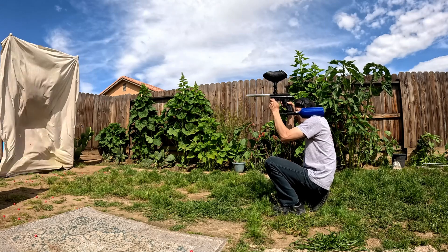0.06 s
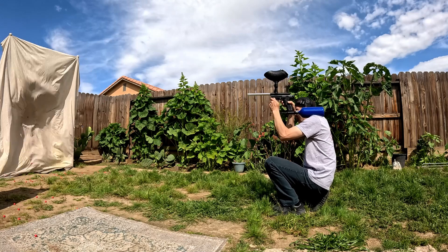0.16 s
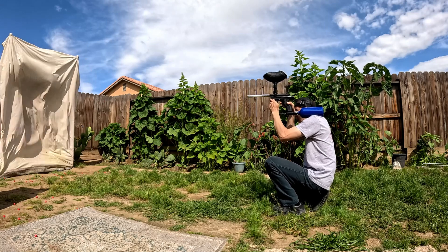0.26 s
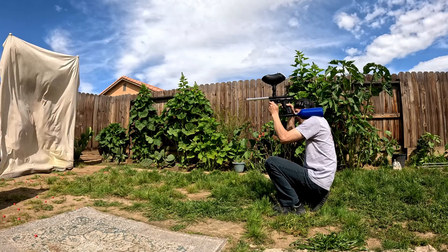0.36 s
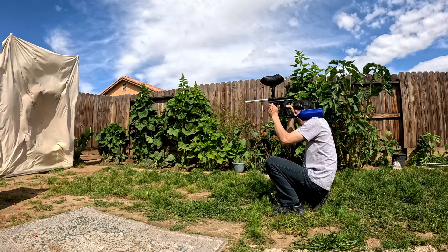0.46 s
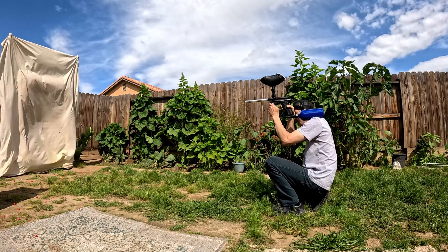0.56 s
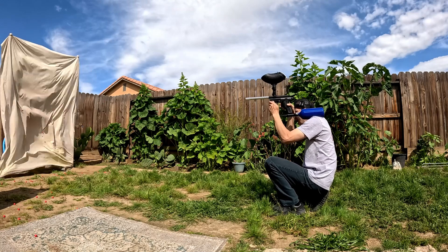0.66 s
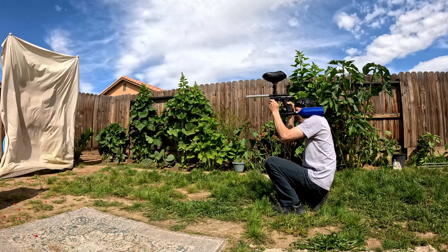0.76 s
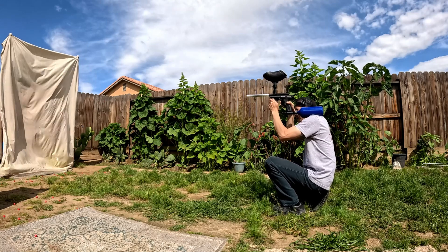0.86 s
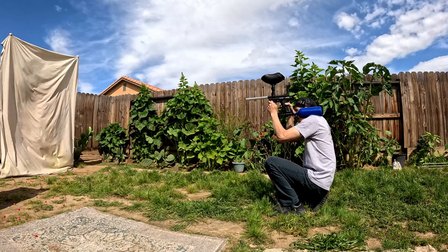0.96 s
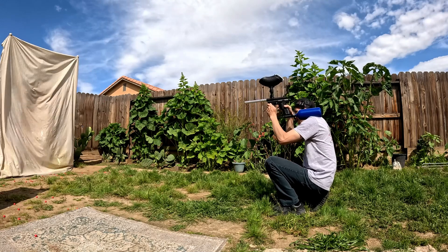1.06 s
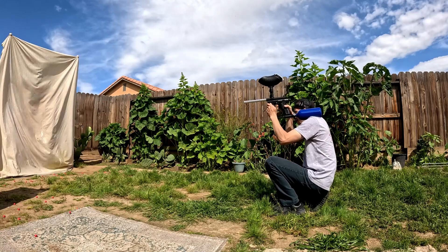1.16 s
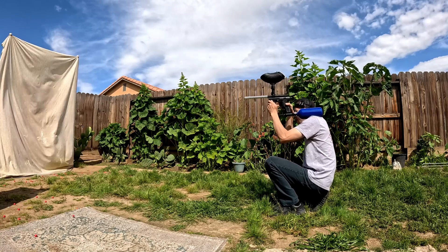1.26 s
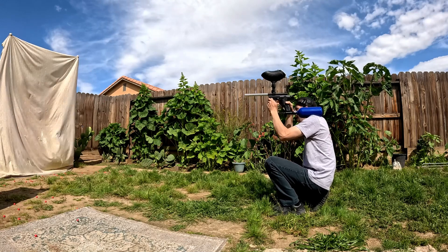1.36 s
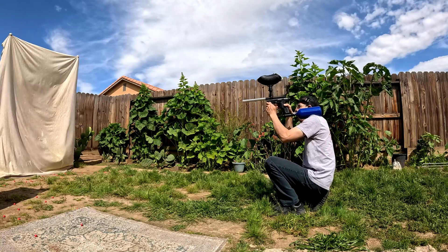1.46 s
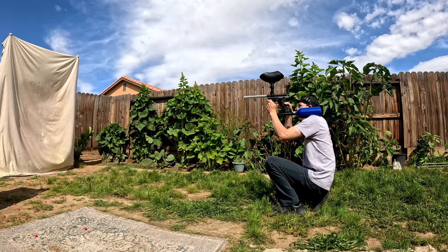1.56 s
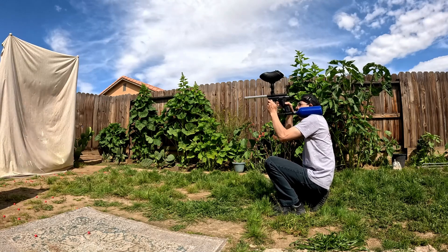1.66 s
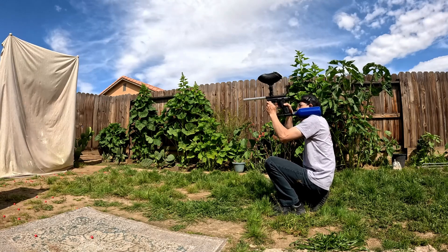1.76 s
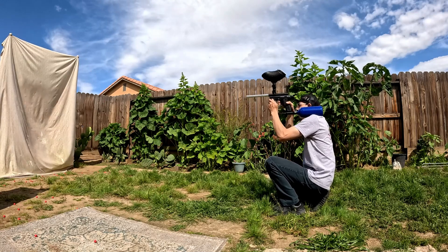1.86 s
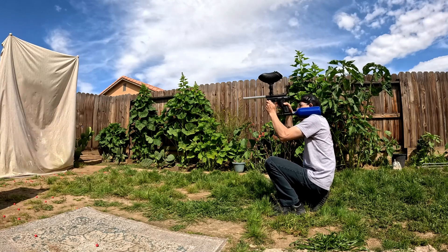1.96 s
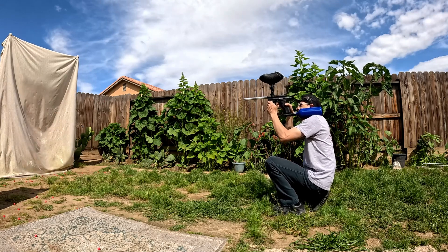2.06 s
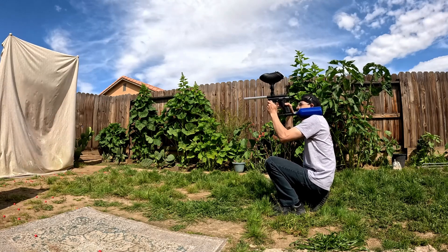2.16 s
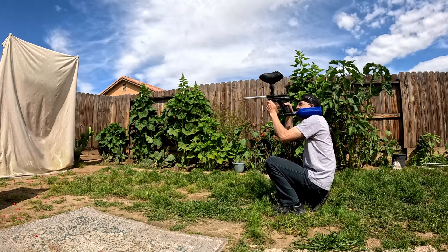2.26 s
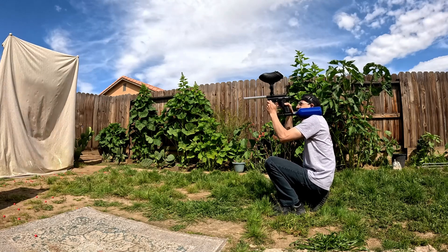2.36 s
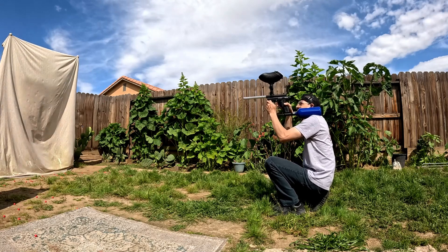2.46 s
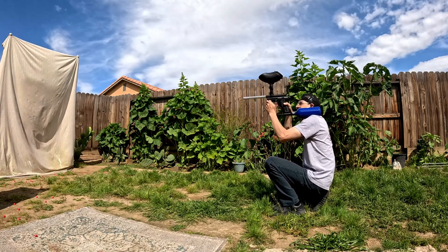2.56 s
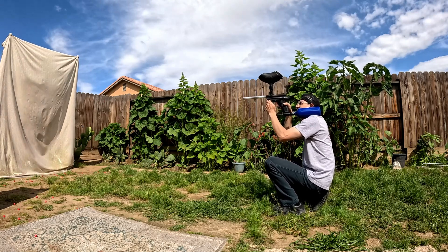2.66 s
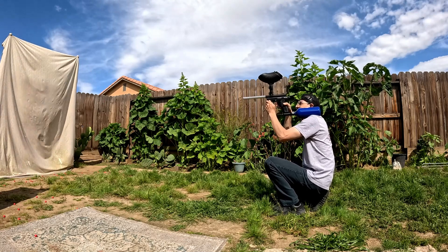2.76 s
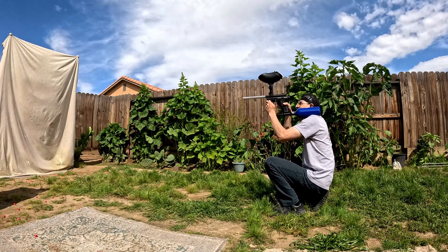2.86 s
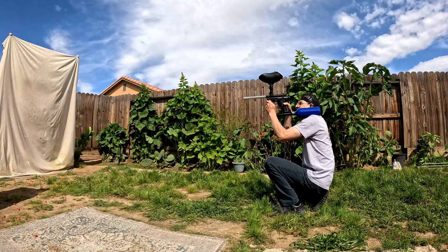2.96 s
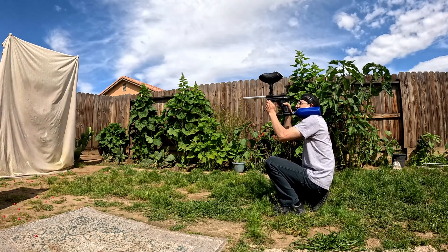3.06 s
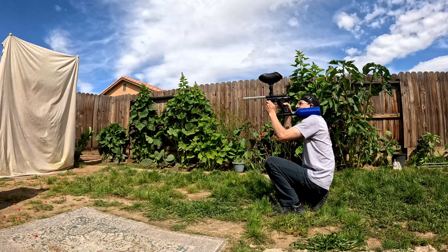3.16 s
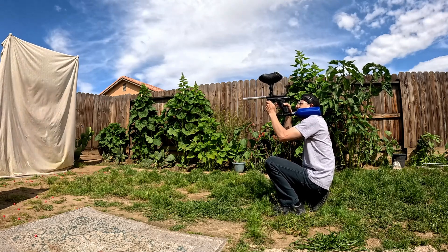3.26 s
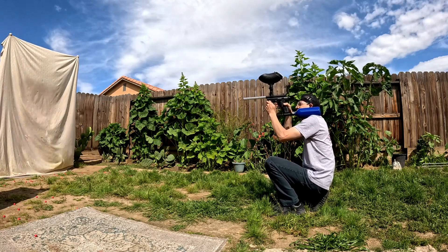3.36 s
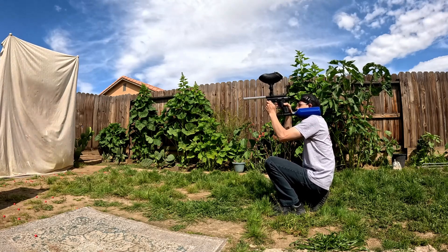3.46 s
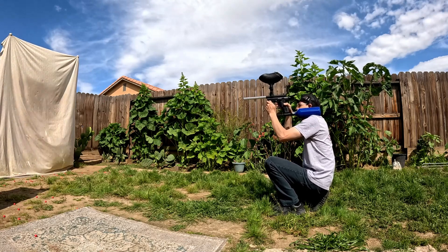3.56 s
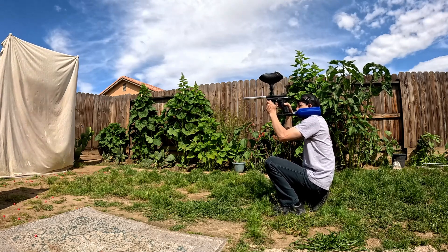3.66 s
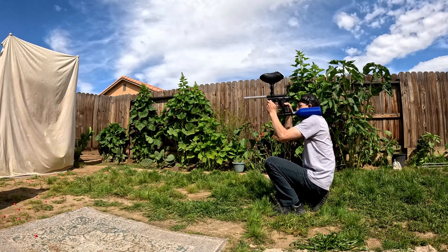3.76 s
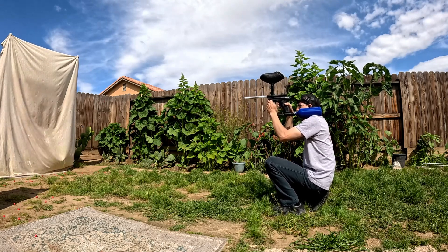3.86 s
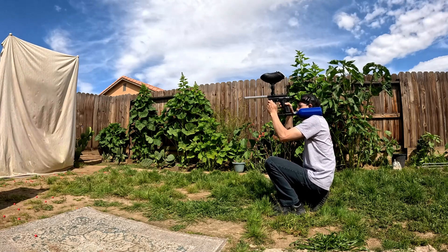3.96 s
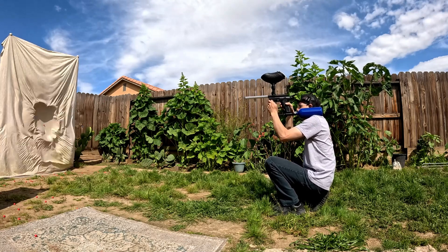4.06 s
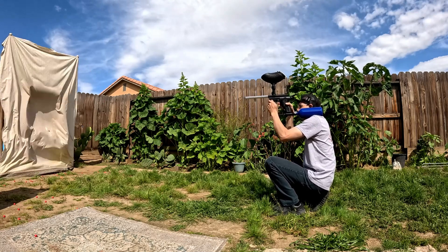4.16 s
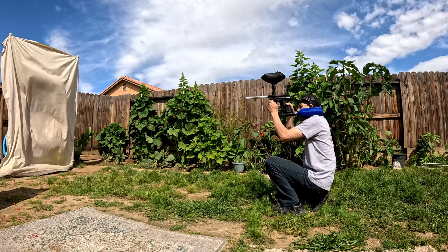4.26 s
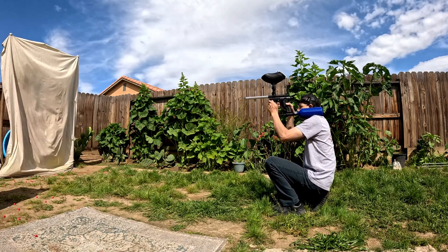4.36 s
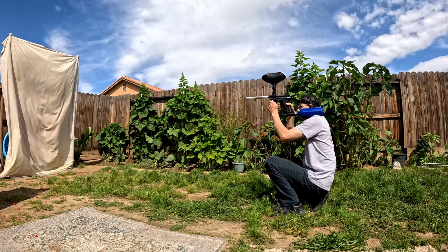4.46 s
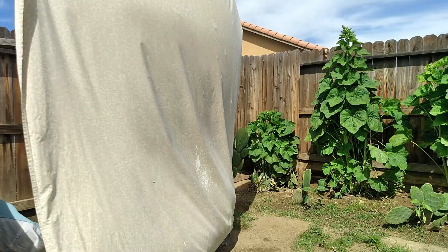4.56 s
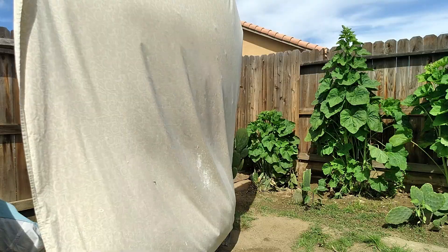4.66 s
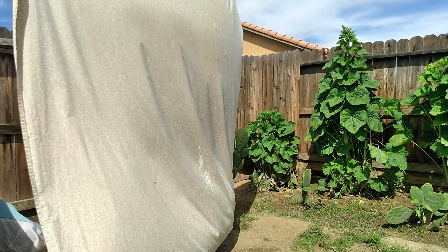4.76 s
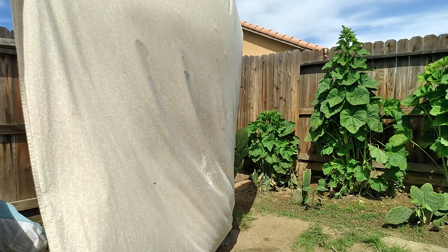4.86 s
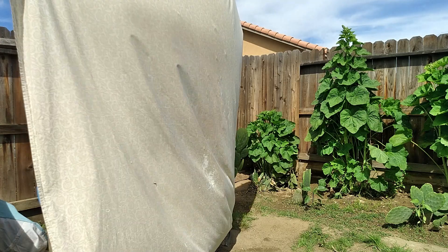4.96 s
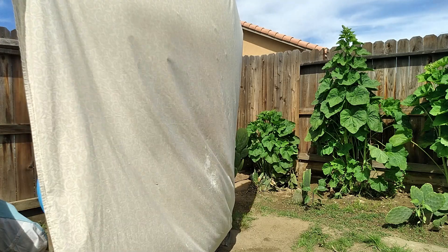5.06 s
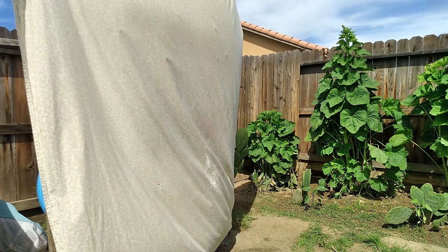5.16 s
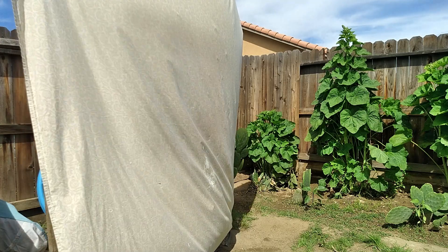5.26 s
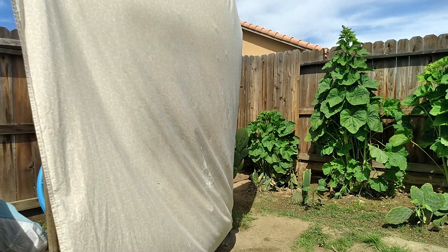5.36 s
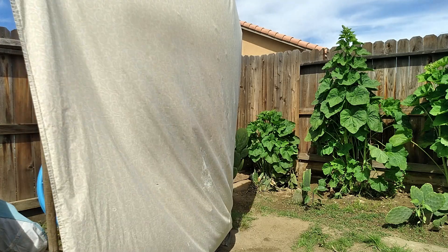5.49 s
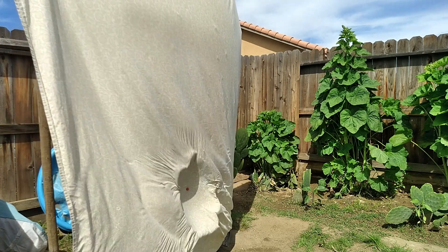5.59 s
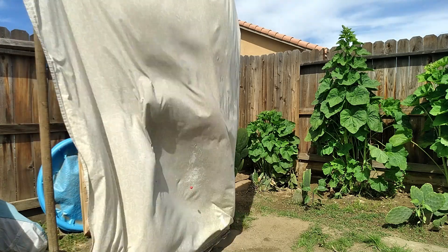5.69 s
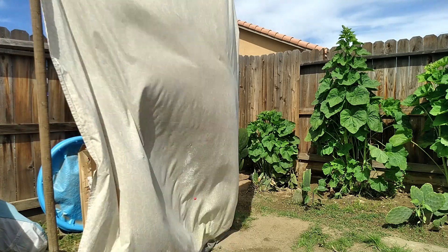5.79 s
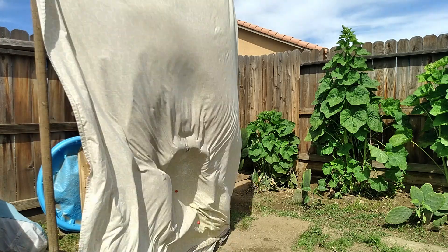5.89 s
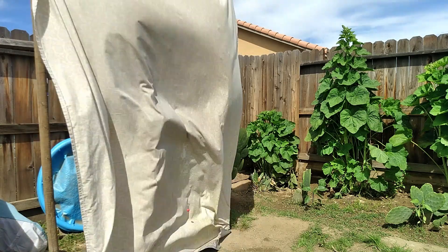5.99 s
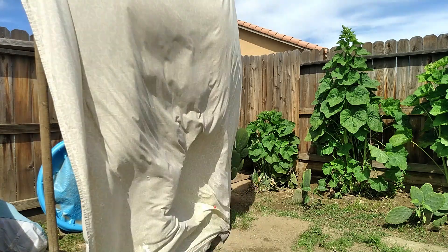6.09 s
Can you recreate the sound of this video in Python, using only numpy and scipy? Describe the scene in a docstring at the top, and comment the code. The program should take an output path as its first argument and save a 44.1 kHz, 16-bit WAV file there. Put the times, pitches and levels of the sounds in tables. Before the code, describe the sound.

Heard from close beside the shooter, sharp air blasts run about five a second, each ball thudding into cloth slightly later, with short echoes off fence and houses. The final two are brighter, empty cracks. Rolling balls rattle and scrape in a hopper through the breezy lull, then a single shot slaps home. From beside the target, quiet hiss and a faint wavering hum give way to three distorted blasts with big flapping cloth.

```python
"""A fenced backyard: a gas-powered paintball marker fires at a hanging sheet, and two shots go off empty.
Bolt, gas and cloth are shaped noise bursts, damped modes and air pulses; delayed copies and decaying noise are echoes.
Balls knock and roll in the hopper as noise grains and irregular bumps, and one more shot follows.
Then the listener stands beside the sheet, down range, where shots hiss and overload the microphone.
Breeze and a faint steady background with microphone hiss are filtered noise; a soft hollow tone, a wavering
sine in noise, swells in the lull."""
import sys
import numpy as np
from scipy import signal
from scipy.fft import rfft, irfft, next_fast_len
from scipy.io import wavfile

SR = 44100
rng = np.random.default_rng(int(sys.argv[2]) if len(sys.argv) > 2 else 0)


def log_audio(samples):
    """Write samples as a 16-bit WAV file to the path given in sys.argv[1]."""
    # one column per channel
    frames = np.atleast_2d(samples).T
    # limit to full scale, then quantise
    limited = np.clip(frames, -1, 1)
    pcm = np.round(limited * 32767).astype(np.int16)
    wavfile.write(sys.argv[1], SR, pcm)


N = 270333
LEAD = SR // 10   # samples of run-in before time zero
MOVE_S = 4.545   # the listening place changes from beside the shooter to beside the sheet
AGE = np.arange(int(.3 * SR)) / SR   # seconds since a short sound began
TIME = np.arange(N) / SR


# Shots: blast t/s, relative blast level/dB, relative bolt level/dB, ball in the barrel (0 or 1)
SHOTS = [(-.0045, -2.5, 3.5, 1), (.193, -2.5, -2.5, 1), (0.4098, -2, -1.5, 1), (0.6217, -3, -3, 1),
         (0.8469, 2, -1.5, 0), (1.068, 3, -4, 0), (4.0798, -0.5, 2.5, 1), (5.648, 1.5, -3, 1),
         (5.8956, 1.5, -1, 1), (6.1012, 1, -0.5, 1)]
# Balls striking the sheet: t/s, relative thump level/dB, relative flapping level/dB, relative snap level/dB
HITS = [(.071, 0.5, -3.5, -1), (0.2708, -6, -1, -3), (0.4846, 1.5, 1, 0), (0.6975, -2.5, -2.5, -2),
        (4.1508, 2.5, 0.5, 0), (5.7013, 7, 1, 8.5), (5.9509, 2, 5, 7.5)]
# Spent balls ticking behind the sheet: t/s, relative level/dB
TICKS = [(4.237, -35), (5.762, -7.5), (6.051, -9.5)]
# Echo envelope of the yard, grass and fence first, then the houses around: t/s, level/dB
YARD = [(0, -48.5), (.006, -37.5), (.02, -42), (.05, -47.5), (.09, -53.5), (.15, -51.5), (.19, -58.5),
        (.25, -66), (.42, -80.5), (.7, -105)]
# Echo envelope beside the sheet: t/s, level/dB
SHEET_CORNER = [(0, -34.5), (.006, -39.5), (.02, -40.5), (.05, -44.5), (.1, -48), (.2, -63), (.7, -110)]
# Likeness of the yard's echoes in the two ears: f/Hz, correlation (0-1)
ECHO_ALIKE = [(100, 0.97), (300, 0.98), (700, 0.2), (2000, .55), (12000, 1)]
# Likeness of the two ears for echoes and sounds by the sheet: f/Hz, correlation (0-1)
NEAR_ALIKE = [(100, 0.99), (280, 0.96), (700, 0.069), (2000, 0.039), (12000, 0.083)]


def firing(bolt_travel_s):
    """Superposition: shots and hits add linearly, each with the echoes of the listener's place."""
    beside, down_range = np.zeros((2, 2, LEAD + N))
    for s, blast_db, bolt_db, loaded in SHOTS:
        near = s > MOVE_S
        track = down_range if near else beside
        if near:
            bolt, gas = shot_from_front(blast_db, bolt_db)
        else:
            bolt, gas = shot_from_side(blast_db, bolt_db, loaded)
        add(track, s - bolt_travel_s, bolt)
        add(track, s, gas)
    for s, thump_db, flap_db, snap_db in HITS:
        near = s > MOVE_S
        add(down_range if near else beside, s, slap(thump_db, flap_db, snap_db, near))
    for s, db in TICKS:
        tick = burst(fade(t60=0.047), NEAR_BOLT, NEAR_ALIKE)
        add(down_range if s > MOVE_S else beside, s, from_db(db) * tick)
    before_move = np.clip((MOVE_S - TIME) / 0.0076, 0, 1)
    heard_beside = outdoors(beside, YARD, ECHO_ALIKE) * before_move
    return heard_beside + outdoors(down_range, SHEET_CORNER, NEAR_ALIKE)


# Spectrum of the bolt clack from the side: f/Hz, level/dB
BOLT = [(100, -17.5), (600, -28.5), (1200, -19), (2000, -19), (3200, -10), (5000, -15), (8000, -24.5),
        (11000, -26), (15000, -40.5)]
# Damped modes of the steel bolt: f/Hz, relative level/dB, t60/s
STEEL = [(3150, -44.5, .08), (3600, -42, .09), (6352, -45, .13), (8100, -44, 0.12), (9740, -42, .14),
         (10780, -36, 0.29), (10900, -41.5, .16)]
# Spectrum of the blast behind a ball: f/Hz, level/dB
BLAST = [(100, -10.5), (280, -3.5), (500, 6), (900, -0.5), (1500, 0.5), (3500, -0.5), (6200, -2),
         (8000, -19), (11000, -23), (15000, -45)]
# Spectrum of the blast from an empty barrel: f/Hz, level/dB
EMPTY_BLAST = [(100, -13.5), (330, -4.5), (600, 4), (1300, 2.5), (3000, 0), (6000, -3.5), (8000, -14.5),
               (11000, -12), (15000, -23)]
# Likeness of the two ears for direct sound: f/Hz, correlation (0-1)
DIRECT_ALIKE = [(300, 1), (5000, 0.93), (11000, 0.41)]


def shot_from_side(blast_db, bolt_db, loaded):
    """Impact and gas discharge: a ball holds the gas back, an empty barrel lets it out in one crack."""
    two_knocks = fade(t60=0.03) + 0.99 * fade(t60=0.04, delay=0.0036)
    bolt = burst(two_knocks, BOLT, DIRECT_ALIKE) + from_db(-13.0) * ring(STEEL)
    if loaded > .5:
        two_surges = .8 * fade(t60=0.013) + .95 * fade(t60=.016, delay=.003)
        gas = burst(two_surges, BLAST, DIRECT_ALIKE) + 0.27 * puff(hz=135, swell_s=0.0031)
    else:
        gas = gas_burst(0.95 * fade(t60=0.016), EMPTY_BLAST) + 0.34 * puff(hz=164.4, swell_s=0.0017)
    bolt_heard = to_right(from_db(bolt_db) * bolt, pan_db=2.0, lag=0.97)
    gas_heard = to_right(from_db(blast_db) * gas, pan_db=0.5, lag=1.0)
    return bolt_heard, off_fence(gas_heard)


def gas_burst(envelope, spectrum):
    """Impulsive discharge: phases alone are kept, so the crack holds all pitches evenly before colouring."""
    x = envelope * noise(DIRECT_ALIKE, len(AGE))
    held = (envelope / envelope.max()) ** (1 / 4)
    for _ in range(3):
        flat = irfft(np.exp(1j * np.angle(rfft(x))), len(AGE))
        x = held * flat
    return colour(rms_one(x) * np.sqrt(np.mean(envelope ** 2)), spectrum)


# Flat echoes off the fence boards: delay t/s, level/dB
FENCE = [(0.0176, -11.5), (0.021, -11), (0.032, -15.5)]


def off_fence(x):
    """Specular reflection: plants stand before the fence, so only the boom comes back whole."""
    dull = colour(x, [(250, 1), (700, -14.5), (3000, -15.5)])
    i = np.arange(x.shape[1])
    for s, db in FENCE:
        echo = np.array([np.interp(i - s * SR, i, side, left=0) for side in dull])
        x = x + from_db(db) * echo
    return x


# Spectrum of the bolt down range and of the ticks: f/Hz, level/dB
NEAR_BOLT = [(100, -42), (350, -16), (900, -36), (2000, -13.5), (4500, -10), (6500, -19.5), (10500, -4.5),
             (12500, -17), (15500, -24)]
# Spectrum of the gas jet down range: f/Hz, level/dB
JET = [(80, -2.5), (220, -4), (400, 2.5), (800, 5.5), (1300, -3.5), (2500, -2), (4500, -4), (7000, -7),
       (9000, -4), (10700, 2), (12500, -6), (15500, -9)]
# Likeness of the jet and bolt in the two ears: f/Hz, correlation (0-1)
JET_ALIKE = [(100, 0.53), (280, 1), (700, 0.28), (2000, 0.2), (12000, 0.48)]


def shot_from_front(blast_db, bolt_db):
    """Jet directivity: down range the barrel points at the listener, a long, bright jet of gas."""
    two_knocks = fade(t60=0.06) + 0.34 * fade(t60=.03, delay=0.012)
    bolt = burst(two_knocks, NEAR_BOLT, JET_ALIKE) * from_db([[2.5], [-2.5]])
    bolt = bolt + from_db(13) * ring(STEEL)
    jet = burst(fade(t60=0.16), JET, JET_ALIKE) + from_db(11) * ring(STEEL)
    bolt_heard = to_left(from_db(bolt_db) * bolt, lag_s=0.000454)
    return bolt_heard, to_left(from_db(blast_db) * jet, lag_s=0.00048)


# Spectrum of the cloth's snap: f/Hz, level/dB
SNAP = [(200, -3.5), (700, 0), (1300, 5), (2200, -9), (5000, -13.5), (10000, -26.5), (15000, -43)]
# Slack-drum modes of the sheet: f/Hz, relative level/dB, t60/s
SHEET = [(70, -29, 0.11), (129, -19.5, 0.043), (204, -26.5, 0.071), (278, -23.5, 0.17)]
# Spectrum of the flapping from afar: f/Hz, level/dB
FLAP = [(40, -9), (80, -2), (130, -1), (200, 5), (380, 3.5), (600, -6.5), (1000, -14), (2000, -30),
        (5000, -36.5), (12000, -63)]
# Spectrum of the flapping close by: f/Hz, level/dB
NEAR_FLAP = [(40, -21), (80, 7), (150, -5), (350, 12), (550, 0.5), (800, 5.5), (1400, -11), (3000, -12.5),
             (12000, -33)]
# Spectrum of the flipping hem: f/Hz, level/dB
HEM = [(80, -29), (250, -22), (420, -13.5), (600, -20.5), (1000, -29.5), (3000, -48.5), (12000, -66.5)]


def slap(thump_db, flap_db, snap_db, near):
    """Membrane excitation: cloth snaps taut, is pushed away, rings, and ripples out to its hem."""
    alike = NEAR_ALIKE if near else DIRECT_ALIKE
    snap = burst(fade(t60=0.0095), SNAP, alike) * from_db([[2.2], [-2.2]])
    thump = -.42 * puff(hz=164, swell_s=0.0016, delay=0.00067) - ring(SHEET)
    if near:
        # close by, the slow heave of the whole sheet is heard too, and the snap lasts longer
        thump = thump - 0.12 * puff(hz=88.3, swell_s=0.013)
        snap = snap + 0.39 * burst(fade(t60=0.041), SNAP, alike)
        flap = burst(1.22 * fade(t60=0.092, delay=0.00027), NEAR_FLAP, alike)
    else:
        flap = burst(1.1 * fade(t60=0.12, delay=0.0025), FLAP, alike)
    # the ripple reaches the hem a tenth of a second later and flips it
    hem = burst(np.exp(-((AGE - .106) / 0.015) ** 2), HEM, alike)
    return from_db(snap_db) * snap + from_db(thump_db) * thump + from_db(flap_db) * (flap + hem)


# Single knocks of balls, hopper and trigger, and a last faint, dull tick:
# t/s, relative peak level/dB, relative treble tilt/dB
CLICKS = [(1.5315, -30, -11.5), (1.5613, -37.5, -17.5), (1.8405, -38.5, 9), (1.9557, -48.5, 23.5),
          (2.0047, -46, -20), (2.1028, -37.5, 3), (2.318, -37, -27.5), (2.3376, -33.5, -20),
          (2.356, -38, -4), (2.8511, -20, -5.5), (2.863, -20, -7), (2.8705, -23, -9), (2.8773, -20.5, -9),
          (2.9095, -25, -7), (2.9632, -27.5, -12), (2.9875, -22.5, -5), (3.0148, -24, -12),
          (3.0263, -26, -10), (3.1003, -27, -9), (3.131, -28, -7), (3.1711, -22.5, 13), (3.1843, -22.5, 13),
          (3.1927, -17, 19), (3.5103, -16.5, 20), (3.5242, -24, 12), (3.551, -28.5, 27), (4.028, -32.5, 13),
          (4.664, -58, -32)]
# Spectrum of the plastic hopper knocked by a ball: f/Hz, level/dB
HOPPER = [(150, -18.5), (500, -5), (800, -16), (1100, 6), (1400, -5.5), (1900, 4), (3000, 3), (4200, -3),
          (6000, -5.5), (8000, -21), (13000, -38)]
# Relative spectrum of rolling, hopper body: f/Hz, level/dB
ROLL_BODY = [(500, -25), (850, -23.5), (1080, 5), (1400, -3.5), (1800, 8), (2500, -9), (3400, -11),
             (4500, -21.5), (8000, -40)]
# Relative spectrum of rolling, treble: f/Hz, level/dB
ROLL_TREBLE = [(1500, -26), (3000, 1), (4300, -1), (4950, 1.5), (5500, -6), (6500, -11.5), (8000, -27),
               (12000, -29), (15000, -43)]
# Relative spectrum of rolling, hollow low part: f/Hz, level/dB
ROLL_LOW = [(200, -22), (400, -4.5), (600, -2), (850, -16.5), (1500, -17), (5000, -55)]
# Damped modes of the trigger spring: f/Hz, relative level/dB, t60/s
SPRING = [(3063, -56.5, .15), (4344, -56, 0.19)]
TRIGGER_S = 4.028   # the trigger takes up and the spring rings faintly
RATTLE_DB = -4.5   # level of the bumps in the body part


def hopper(click_db, body_db, treble_db, low_db):
    """Contact excitation: balls knock, roll and rattle in a plastic shell, then the trigger takes up."""
    track = np.zeros((2, LEAD + N))
    for s, db, bright_db in CLICKS:
        knock = burst(fade(t60=0.0028) + 0.28 * fade(t60=.025), HOPPER, DIRECT_ALIKE)
        click = colour(knock, [(2000, 0.0024), (6000, 0.84 * bright_db)])
        add(track, s, from_db(db + click_db) * click / np.abs(click).max())
    body, treble, low = rolling_levels()
    bumps = from_db(RATTLE_DB) * rattle(ROLL_BODY, jitter=.35, spread_db=4.0)
    rolling = from_db(body_db) * grains(per_s=2700, spread_db=3.5, spectrum=ROLL_BODY)
    add(track, 0, body * (rolling + bumps))
    scrape = grains(per_s=2500, spread_db=2.5, spectrum=ROLL_TREBLE)
    scrape = scrape + from_db(-2) * rattle(ROLL_TREBLE, jitter=.3, spread_db=2.5)
    add(track, 0, from_db(treble_db) * treble * scrape)
    add(track, 0, from_db(low_db) * low * grains(per_s=170, spread_db=2.0, spectrum=ROLL_LOW))
    add(track, TRIGGER_S, ring(SPRING))
    return outdoors(to_right(track, pan_db=2.0, lag=0.6), YARD, ECHO_ALIKE, wet_db=-4)


# Each tilt of the hopper sets the balls rolling until they come to rest: t/s at full height,
# 60 dB swell/s, 60 dB fade/s, rolling on/s, then relative body, treble and hollow low level/dB
ROLLS = [(1.572, .13, 0.21, 0.12, -51.5, -63, -83), (1.778, .03, 0.34, 0.077, -61, -73, -90),
         (1.865, .13, .25, 0.079, -47, -61.5, -73), (2.01, 0.052, 0.62, 0.11, -55.5, -71, -69),
         (2.113, 0.068, 0.3, .07, -48, -59, -73), (2.35, 0.28, 0.31, .13, -47, -64.5, -72),
         (2.49, 0.27, 0.77, 0.37, -65, -92, -59.5), (2.587, 0.14, .3, 0.016, -58.5, -73.5, -74),
         (2.8, 0.23, .3, .005, -54.5, -88.5, -62.5), (2.885, .09, 0.43, 0.25, -42.5, -44.5, -47.5),
         (3.01, 0.38, 1.0, 0.16, -47, -52, -69), (3.194, .04, 0.15, .1, -43.5, -30.5, -66),
         (3.26, 0.21, 1, 0.25, -53.5, -44, -71), (3.514, .03, 0.49, .1, -46, -42.5, -61),
         (3.845, .04, .3, .03, -68.5, -70, -85)]
REST_S = 0.098   # coming to rest takes a further 60 dB off in this time


def rolling_levels():
    """Energy decay: each spell of rolling swells, slackens and stops, in body, treble and hollow gains."""
    total = 0
    for s, swell_s, fade_s, length_s, *levels_db in ROLLS:
        stop = from_db(-60 * np.clip((TIME - s - length_s) / REST_S, 0, 2))
        total = total + from_db(levels_db)[:, None] * swell(s, swell_s, fade_s) * stop
    return total


RATTLES_PER_S = 88   # median pace of rolling balls bumping


def rattle(spectrum, jitter, spread_db):
    """Irregular impact train: ball after ball bumps the shell at an uneven pace; rms 1."""
    pace, size = rng.standard_normal((2000, 2)).T
    at = (np.cumsum(np.exp(jitter * pace)) / RATTLES_PER_S * SR).astype(int)
    inside = at < N
    bumps = np.zeros(N)
    bumps[at[inside]] = from_db(spread_db * np.clip(size, -1.5, 1.5))[inside]
    envelope = signal.fftconvolve(bumps, fade(t60=0.011))[:N]
    return rms_one(colour(envelope * noise(DIRECT_ALIKE, N), spectrum))


def grains(per_s, spread_db, spectrum):
    """Shot noise: many tiny contacts of uneven size at random instants; rms 1."""
    sizes = from_db(spread_db * np.minimum(rng.exponential(1, N), 3))
    contacts = (rng.random(N) < per_s / SR) * sizes
    return rms_one(colour(contacts * noise(DIRECT_ALIKE, N), spectrum))


# Gusts: t/s, half length to 1/e/s, level/dB
GUSTS = [(2.125, 0.032, -50.5), (2.22, 0.21, -56), (3.06, 0.12, -56), (3.883, 0.23, -52), (4.2, .3, -48)]
# Relative spectrum of the wind: f/Hz, level/dB
WIND = [(15, -12), (30, 1.5), (55, 0), (100, -5.5), (200, -13), (400, -30.5), (800, -36.5), (2000, -45),
        (8000, -64.5)]
# Spectrum of the faint steady background noise with microphone hiss: f/Hz, level/dB
BACKGROUND = [(40, -60), (90, -56.5), (250, -56.5), (600, -67.5), (1000, -85.5), (3000, -86.5), (7000, -84),
              (9500, -78), (10700, -90), (12000, -85), (15000, -99)]
# Spectrum of the faint high hiss beside the sheet: f/Hz, level/dB
HISS = [(1000, -79.5), (6500, -82), (8500, -77), (9500, -67.5), (10800, -74.5), (12000, -71),
        (14500, -100.5), (16000, -105)]
# Relative spectrum of the rustle around the tone: f/Hz, level/dB
TONE_HALO = [(150, -14), (400, -11), (630, 2.5), (830, -13.5), (1100, -31), (3000, -53)]
BREEZE_DB, SHELTER_DB = -58.5, -77   # wind added beside the shooter; wind present throughout
# the hollow tone swells in the lull, holds and dies away; swell and fade are times per 60 dB
TONE_FULL_S, TONE_SWELL_S, TONE_HOLD_S, TONE_FADE_S = 4.937, 0.51, 0.28, 0.36
TONE_DB, TONE_REST_DB = -56.5, -80   # common gain of tone and rustle: swelling part, steady part


def garden(tone_hz, tone_db, halo_db):
    """Broadband and tonal background: gusty breeze, faint steady noise with microphone hiss, hollow tone."""
    moved = TIME > MOVE_S
    gusts = sum(from_db(db) * np.exp(-((TIME - s) / half_s) ** 2) for s, half_s, db in GUSTS)
    before_move = np.clip((MOVE_S - TIME) / .02, 0, 1)
    wind_level = from_db(SHELTER_DB) + (from_db(BREEZE_DB) + gusts) * before_move
    wind = wind_level * rms_one(colour(noise(ECHO_ALIKE, N), WIND))
    steady = colour(noise(NEAR_ALIKE, N), BACKGROUND) + moved * colour(noise(NEAR_ALIKE, N), HISS)
    slow = signal.butter(2, 16, fs=SR, output="sos")
    pitch_waver, level_waver = rms_one(signal.sosfilt(slow, rng.standard_normal((2, N))))
    phase = 2 * np.pi * np.cumsum(tone_hz * (1 + 0.0041 * pitch_waver)) / SR
    tone = np.sin(phase) * (1 + 0.31 * level_waver)
    halo = rms_one(colour(noise(ECHO_ALIKE, N), TONE_HALO))
    swelling = swell(TONE_FULL_S, TONE_SWELL_S, TONE_FADE_S, TONE_HOLD_S)
    level = from_db(TONE_REST_DB) + from_db(TONE_DB) * swelling
    return wind + steady + moved * level * (from_db(tone_db) * tone + from_db(halo_db) * halo)


# Colour and extra fading of the echoes: f/Hz, level/dB, fading/(dB/s)
ECHO = [(60, -7, 1.5), (152, 0, -3.5), (333, 3.5, -2.5), (790, -0.5, -1.5), (1880, -0.5, 4),
        (4930, -2.5, 24), (9070, 0.5, 62), (15000, -4, 82.5)]


def outdoors(x, echoes, alike, wet_db=0):
    """Diffuse scattering: convolve with decaying noise whose treble dies first; drop the run-in."""
    t = np.arange(int(.7 * SR)) / SR
    hz, s, frames = signal.stft(noise(alike, len(t)), SR, nperseg=256)
    gain_db = at_hz(ECHO, hz)[:, None] - at_hz(ECHO, hz, axis=2)[:, None] * s
    scattered = signal.istft(frames * from_db(gain_db), SR)[1][:, :len(t)]
    tail = scattered * from_db(curve(echoes, t) + wet_db)
    wet = signal.fftconvolve(x, tail, axes=1)[:, :x.shape[1]]
    return (x + wet)[:, LEAD:]


def to_right(x, pan_db, lag):
    """Interaural differences: a right-hand source is louder there, and late in the left ear by lag samples."""
    i = np.arange(x.shape[1])
    return np.array([np.interp(i - lag, i, x[0]), x[1]]) * from_db([[-pan_db / 2], [pan_db / 2]])


def to_left(x, lag_s):
    """Interaural time difference: a source on the left reaches the right ear later."""
    i = np.arange(x.shape[1])
    return np.array([x[0], np.interp(i - lag_s * SR, i, x[1], left=0)])


def ring(modes):
    """Modal synthesis: struck, damped modes, a little different in strength every time."""
    total = 0
    for hz, db, t60 in modes:
        strength = from_db(db + rng.normal(0, 1.7))
        total = total + strength * np.sin(2 * np.pi * hz * AGE) * fade(t60)
    return total


def puff(hz, swell_s, delay=0):
    """Volume displacement: a push of air and its rebound, a swelling and dying sine."""
    t = np.maximum(AGE - delay, 0)
    return np.sin(2 * np.pi * hz * t) * t / swell_s * np.exp(1 - t / swell_s)


def burst(envelope, spectrum, alike):
    """Turbulence: a short burst of enveloped, filtered noise."""
    return colour(envelope * noise(alike, len(AGE)), spectrum)


def fade(t60, delay=0):
    """Exponential decay: a sudden start and a fall of 60 dB in t60 seconds."""
    return (AGE >= delay) * from_db(-60 * np.maximum(AGE - delay, 0) / t60)


def swell(s, swell_s, fade_s, hold_s=0):
    """Exponential growth and decay: climb to full height at time s, hold, and fall, in times per 60 dB."""
    below = np.maximum(s - TIME, 0) / swell_s + np.maximum(TIME - s - hold_s, 0) / fade_s
    return from_db(-60 * np.minimum(below, 3))


def noise(alike, size):
    """Interaural coherence: white stereo noise whose two sides agree as the table says."""
    mid, side = rfft(rng.standard_normal((2, 2 * next_fast_len(size // 2 + 1))))
    c = np.clip(at_hz(alike, np.linspace(0, SR / 2, len(mid))), -1, 1)
    stereo = np.sqrt((1 + c) / 2) * mid + np.sqrt((1 - c) / 2) * side * [[1], [-1]]
    return irfft(stereo)[:, :size]


def colour(x, spectrum):
    """Minimum phase: a causal filter with the given gains, by folding the cepstrum."""
    size = 2 * next_fast_len(x.shape[-1] // 2 + 2048)
    gains = from_db(at_hz(spectrum, np.fft.rfftfreq(size, 1 / SR)))
    cepstrum = irfft(np.log(gains))
    cepstrum[1:size // 2] *= 2
    cepstrum[size // 2 + 1:] = 0
    return irfft(rfft(x, size) * np.exp(rfft(cepstrum)))[..., :x.shape[-1]]


def add(track, s, sound):
    """Linear superposition: mix a sound into a track that has a run-in."""
    start = LEAD + round(s * SR)
    part = track[:, start:start + sound.shape[-1]]
    part += sound[..., :part.shape[1]]


def from_db(db):
    """Logarithmic level: decibels to amplitude gain."""
    return 10 ** (np.asarray(db) / 20)


def rms_one(x):
    """Mean power: scale to rms 1."""
    return x / np.sqrt(np.mean(x ** 2) + 1e-20)


def curve(rows, t, axis=1):
    """Linear interpolation: read one column of a table along its first."""
    rows = np.array(rows)
    return np.interp(t, rows[:, 0], rows[:, axis])


def at_hz(rows, hz, axis=1):
    """Logarithmic pitch: read a table on a log-frequency axis."""
    rows = np.array(rows)
    return np.interp(np.log(hz + 1), np.log(rows[:, 0]), rows[:, axis])


def scene():
    """Superposition of marker, hopper and garden."""
    shots = firing(bolt_travel_s=.015)
    handling = hopper(click_db=-1, body_db=-4.0, treble_db=-4, low_db=-0.5)
    return shots + handling + garden(tone_hz=620, tone_db=-0.5, halo_db=-7.0)


CUTOFF_HZ = 16000   # upper edge of the passband


def record(dry):
    """Saturation and band limiting: loud peaks overload; rumble and the very top are cut."""
    top = .9   # limit of the overload, full scale being 1
    no_rumble = signal.sosfilt(signal.butter(2, 38, "high", fs=SR, output="sos"), dry)
    rounded = top * np.tanh(no_rumble / top)
    return signal.sosfilt(signal.ellip(10, .2, 80, CUTOFF_HZ, fs=SR, output="sos"), rounded)


dry = scene()
out = record(dry)
log_audio(out)
```